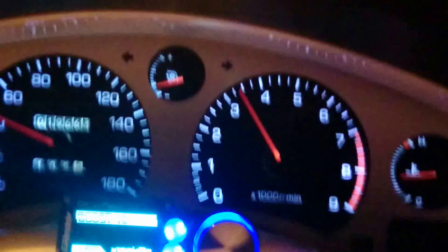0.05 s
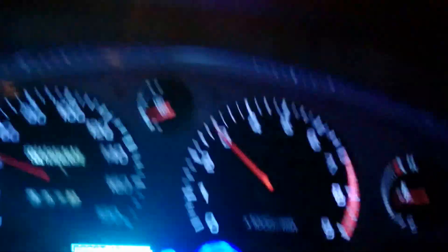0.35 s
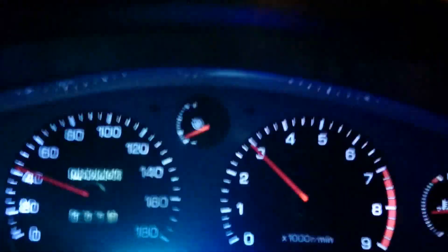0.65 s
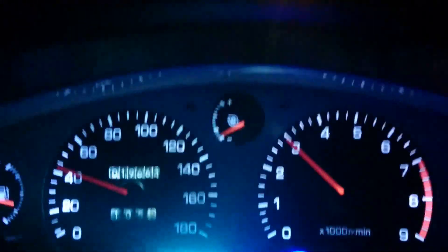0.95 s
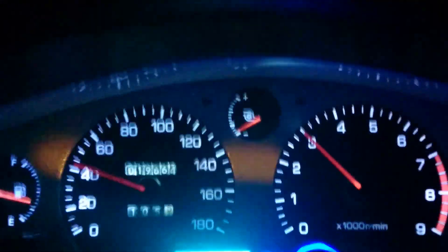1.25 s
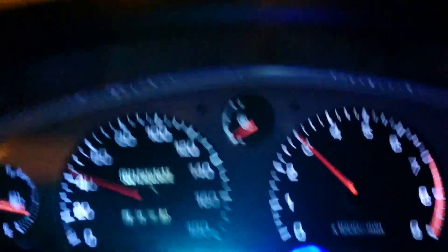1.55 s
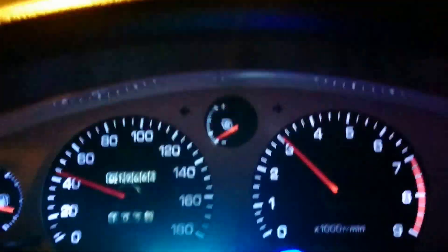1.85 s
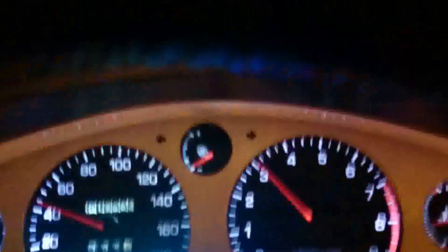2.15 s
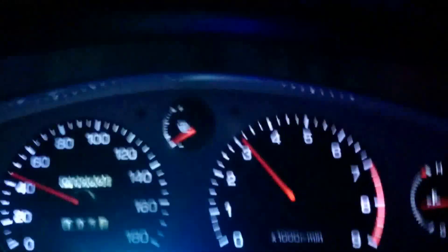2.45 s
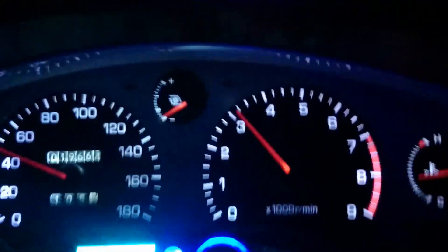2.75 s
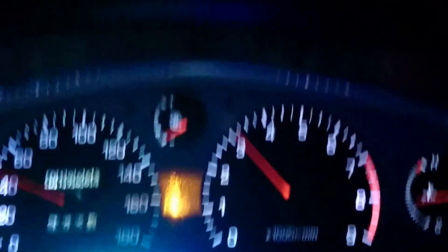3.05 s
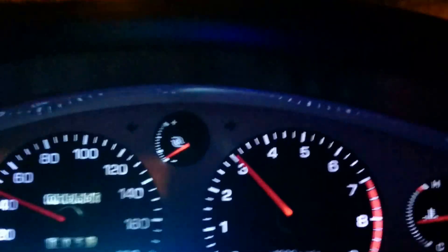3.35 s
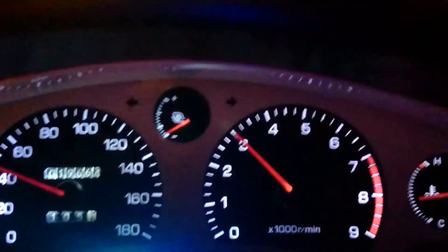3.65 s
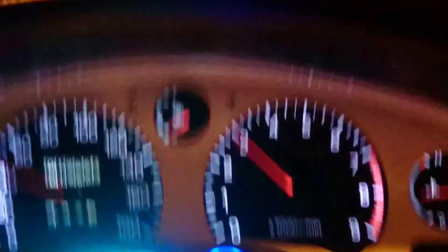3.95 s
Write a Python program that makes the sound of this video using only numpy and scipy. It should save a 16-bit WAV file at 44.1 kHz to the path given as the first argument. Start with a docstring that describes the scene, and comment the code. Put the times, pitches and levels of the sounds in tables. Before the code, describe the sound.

A turbocharged car engine drones at moderate revs, heard from the driver's seat. It eases off with brief shudders, pulls with a rising whistle, then eases again as the whistle falls into fluttering air puffs over road rumble.

```python
"""A turbocharged four-cylinder engine near 3000 rpm, heard inside the car as a booming series of orders.
The driver lifts and the drivetrain shudders; then the engine pulls and the turbo's whine rises with
its shaft speed. At a second lift the whine falls and the compressor surges: air breaks back through it
in fluttering puffs. Beneath it all the road, rougher towards the end, excites the body and the tyres."""
import sys
import numpy as np
from scipy import signal
from scipy.fft import rfft, irfft, dct
from scipy.io import wavfile
from scipy.ndimage import uniform_filter1d

SR = 44100
rng = np.random.default_rng(int(sys.argv[2]) if len(sys.argv) > 2 else 0)


def master_out(mix):
    """Clip the mix to full scale and print it as 16-bit PCM to the path in sys.argv[1]."""
    frames = np.transpose(np.atleast_2d(mix))
    ceiling = np.clip(frames, -1, 1)
    pcm = np.round(ceiling * 32767).astype(np.int16)
    wavfile.write(sys.argv[1], SR, pcm)


N = 176400

# Noise spectra. Each row: frequency in Hz, relative spectral density in dB.
SHELL_SPECTRUM = [(10, -38), (24, -23), (31, 0), (38, 5), (47, 0), (60, 7.5), (72, 7), (95, -8),
                  (200, -46.5)]  # deep boom of the body shell
RUMBLE_SPECTRUM = [(20, -40), (55, -20), (80, 1), (125, 1), (165, -1.5), (195, -7), (232, 0.5),
                   (262, -14.5), (330, -17), (800, -84)]  # road rumble
TYRE_SPECTRUM = [(150, -48), (255, -5.5), (305, -0.5), (345, -6), (395, 1), (445, -2), (490, -0.5),
                 (560, -4.5), (610, -7), (680, -4), (760, -4.5), (900, -2), (1020, -3), (1150, -9),
                 (1350, -8), (1700, -18.5), (2600, -18.5), (4000, -22), (8000, -42), (16000, -60)]  # tyre roar
PIPE_SPECTRUM = [(2500, -16), (4000, -16.5), (4800, -11), (5200, -2.5), (5550, -1.5), (5900, -3.5),
                 (6300, -10.5), (6650, -10.5), (7300, -18.5), (9000, -39), (16000, -54)]  # resonance of the intake pipe
HISS_SPECTRUM = [(1200, -18), (2500, 2.5), (4500, 5.5), (6500, 3.5), (7800, 0.5), (8700, 2.5),
                 (10200, -1.5), (11200, 3.5), (12500, -4.5), (13600, -1), (14900, -5), (16000, -5.5)]  # broad hiss of the intake air
CLATTER_SPECTRUM = [(700, 4.5), (1500, 2), (2300, -2), (3100, -2.5), (4300, -4.5), (5300, 1), (7000, -30),
                    (10000, -40), (16000, -35)]  # valves and injectors
# Envelopes. Each row: time in seconds, level in dB.
SHELL_LEVEL = [(0, -21), (.35, -25), (.6, -24), (.85, -31), (1.15, -28), (1.4, -21), (1.75, -28),
               (2.2, -28), (2.6, -24), (2.95, -24), (3.3, -18), (3.55, -18.5), (3.75, -20.5), (4, -25.5)]
RUMBLE_LEVEL = [(0, -31), (.2, -27), (.28, -27), (.44, -21.5), (.52, -19), (.7, -24.5), (1.1, -25.5),
                (1.4, -23.5), (2, -26), (2.6, -23), (2.95, -23), (3.2, -19), (3.6, -18.5), (3.85, -23),
                (4, -16.5)]
TYRE_LEVEL = [(0, -28.5), (.13, -31), (.26, -38.5), (.5, -29.5), (1, -32.5), (1.7, -35.5), (2.3, -30.5),
              (2.6, -28.5), (2.92, -30.5), (3.1, -24), (3.3, -26), (3.65, -28), (4, -28)]
CLATTER_LEVEL = [(0, -48), (.25, -48), (.55, -41), (1.2, -37.5), (2, -35), (2.7, -38), (3.2, -41), (4, -52)]
WHIRR_LEVEL = [(0, -63), (.35, -67), (.6, -45), (.95, -52), (1.2, -42), (1.45, -49), (1.8, -55), (2.6, -57),
               (3, -72), (4, -61)]  # accessory drive
FIRING_LEVEL = [(0, -17.5), (.1, -18), (.19, -13.5), (.27, -25.5), (.44, -34.5), (.51, -16), (.8, -16),
                (1.3, -17), (2, -17.5), (2.65, -18), (2.85, -19), (3, -25.5), (3.5, -25.5), (4, -21.5)]  # the firing tone, which also stands for engine load
# Shudders and bumps. Each row: centre in seconds, pitch in Hz, 1/e half-length in seconds, peak in dB.
JOLTS = [(.105, 99, 0.0066, -3.5), (.218, 91, 0.011, -1), (.367, 89.7, 0.0081, -10),
         (.497, 105.2, 0.0062, -6), (.518, 118.4, .005, -19), (3.879, 68, .014, -5.5)]
# Intake airflow. Each row: time in seconds, pipe level in dB, hiss level in dB.
AIRFLOW = [(0, -38.5, -36), (.11, -38, -39.5), (.25, -44, -49), (.45, -42, -50.5), (.55, -47.5, -54),
           (.8, -48.5, -48.5), (1.28, -46.5, -44.5), (1.5, -45.5, -47.5), (1.8, -45, -40.5),
           (2.2, -38, -39.5), (2.4, -34, -37), (2.72, -32.5, -34), (2.95, -32, -34.5), (3.15, -32, -35),
           (3.4, -36, -47), (3.66, -39.5, -56), (3.92, -41, -60), (4, -39.5, -61)]
# Compressor surge. Each row: peak time in seconds, change of the pipe in dB, change of the hiss in dB.
SURGE_PUFFS = [(.107, 1, 2), (.285, -3, 4), (.34, 0, 4), (.4, -2, 7), (.46, 1.5, 0), (2.785, 1, 6.5),
               (2.853, 0, 4.5), (2.918, 4, 2), (2.98, 3.5, 2.5), (3.039, 3.5, 3.5), (3.095, 4, 3),
               (3.155, 4, 0), (3.215, 6.5, 1), (3.274, 2.5, 5), (3.335, 5, 6), (3.393, 7.5, 8),
               (3.448, 5, 12), (3.503, 6, 10), (3.57, 6.5, 2), (3.615, 3, 2), (3.672, 1, 5), (3.735, -3, 4),
               (3.785, 3, 0), (3.835, 1.5, 12), (3.885, 1.5, 13), (3.945, -1, 14), (3.99, 1.5, 4)]
# Turbo whine. Each row: time in seconds, pitch in Hz, level of the whistle's core in dB.
TURBO_WHINE = [(0, 4710, -44), (.12, 4340, -42), (.28, 3930, -59), (.5, 3494, -46.5), (.62, 3500, -47),
               (.85, 3940, -53), (1.12, 4450, -49), (1.4, 4800, -57), (1.74, 5130, -44.5),
               (1.87, 5250, -38), (2.05, 5360, -42.5), (2.25, 5640, -37.5), (2.33, 5650, -35),
               (2.48, 5770, -34.5), (2.66, 5665, -38), (2.8, 5570, -41), (2.98, 4969, -43),
               (3.13, 4370, -39.5), (3.5, 3460, -54), (4, 2936, -71)]
# Engine speed. Each row: time in seconds, firings per second.
FIRING_RATE = [(0, 118), (.15, 111), (.28, 100), (.45, 96.5), (.68, 96.2), (1, 97.5), (1.3, 99.2),
               (1.7, 101), (2, 102.7), (2.5, 105), (2.75, 106), (3, 104.5), (3.3, 102.3), (3.55, 100.3),
               (4, 98)]
# Engine orders. Each row: multiple of the firing rate, level under load in dB, level coasting in dB.
ORDERS = [(.5, -34, -29.5), (1.5, -33, -47), (2, -31.5, -33), (2.5, -46, -44), (3.5, -65.5, -32),
          (4.5, -47, -52), (5.5, -60, -69), (6, -61, -54), (7, -49, -41.5), (8, -54, -39), (9, -39, -58),
          (9.5, -73, -72), (10, -47, -57), (13, -57, -49), (19, -59, -74)]
# Cabin drone. Each row: time in seconds, levels in dB at 3, 4 and 5 times the firing rate.
DRONE_LEVELS = [(0, -33, -39, -42), (.15, -41.5, -41, -50), (.27, -54, -51, -57), (.5, -47, -39, -42),
                (.75, -43, -40, -36.5), (1.3, -42, -37.5, -37.5), (1.55, -48, -52, -45),
                (2, -37, -47.5, -45), (2.2, -44, -46, -54), (2.45, -42, -47.5, -37), (2.9, -44, -38, -52),
                (3.2, -35, -44.5, -57), (3.5, -31, -49, -46), (3.75, -44, -42, -54), (4, -42, -42, -52)]
# Microphone balance. Each row: frequency in Hz, left minus right in dB.
STEREO_TILT = [(40, -8), (100, -4.5), (210, -3), (330, -4.5), (700, -2.5), (1100, -9.5), (1350, -3),
               (1700, -5), (2800, -3.5), (3600, -1.5), (4500, -0.5), (5700, -7), (6600, 0.5), (8300, 2.5),
               (9500, 6), (11000, 16), (12800, -2), (14800, -6), (16000, -8)]
# Likeness of the noise at the two microphones. Each row: frequency in Hz, coherence from 0 to 1.
COHERENCE = [(30, 1), (100, 0.86), (220, 0.91), (340, .5), (620, 0.05), (820, 0.53), (1330, 0.96),
             (1750, 0.054), (2400, 0.6), (3300, 0.27), (5000, 0.081), (5850, 0.54), (6250, .1),
             (6700, 0.27), (8500, .1), (16000, .05)]
# Phase between the microphones. Each row: frequency in Hz, lead of the left in radians.
PHASE_LEAD = [(40, 0.86), (100, 0.21), (240, 0.42), (320, 0.97), (420, -0.5), (800, -2), (1200, -2.5),
              (1500, -4.5), (2100, -5), (2600, -5), (3200, -3), (4600, -7), (5850, -8.5), (6700, -5)]

RIPPLE_DB, RIPPLE_STEP_HZ, RIPPLE_FULL_HZ = 1.94, 69.5, 340
PUFF_RISE_S, PUFF_FALL_S = 0.012, 0.016
PIPE_FLICKER_DB, HISS_FLICKER_DB, WHINE_FLICKER_DB, TURBULENCE_DB = 0.4, 1, 1, 1.33
SKIRT_DB, OCTAVE_DB = -3.5, -20  # relative to the whistle's core
SPEED_JITTER, WHINE_JITTER, CLATTER_DEPTH = .003, .00298, 0.19  # fractions of the mean
ORDER_WAVER_DB, FIRING_WAVER_DB = 1.5, .5
WHIRR_PER_FIRING = 23
CEILING, CUTOFF_HZ = .92, 15850


def amp(db):
    """Amplitude grows tenfold with every 20 dB."""
    return 10 ** (np.asarray(db) / 20)


def unit(x):
    """Normalisation to an rms of one."""
    return x / np.sqrt(np.mean(x ** 2) + 1e-20)


def curve(rows, column=1):
    """Linear interpolation of a time table at every sample."""
    rows = np.array(rows)
    return np.interp(np.arange(N) / SR, rows[:, 0], rows[:, column])


def at_frequency(rows, hz):
    """Interpolation of a table on a logarithmic frequency axis."""
    f, value = np.transpose(rows)
    return np.interp(np.log(hz + 1), np.log(f + 1), value)


def filtered(x, gain):
    """Filtering is spectral multiplication, here by N gains from zero to half the sample rate."""
    return idct_spectrum(dct(x, norm="ortho") * gain)


def idct_spectrum(spectrum):
    """A sum of weighted cosines restores the waveform."""
    return dct(spectrum, type=3, norm="ortho")


def wander(rate_hz):
    """Low-passed noise gives a smooth random drift of rms one."""
    f = np.fft.rfftfreq(N, 1 / SR)
    lowpass = np.exp(-(f / rate_hz) ** 2) * (f > 0)
    return unit(irfft(rfft(rng.standard_normal(N)) * lowpass, N))


def noise(spectrum):
    """Partial coherence: two microphones share only part of a coloured noise."""
    f = np.fft.rfftfreq(N, 1 / SR)
    shared, separate = rfft(rng.standard_normal((2, N)))
    coherence = np.clip(at_frequency(COHERENCE, f), 0, 1)
    left = shared * np.exp(1j * at_frequency(PHASE_LEAD, f))
    right = coherence * shared + np.sqrt(1 - coherence ** 2) * separate
    return unit(irfft(np.array([left, right]) * amp(at_frequency(spectrum, f)), N))


def turbulent(x):
    """Turbulence modulates a noise: small patches of its spectrum swell and sink."""
    frames = signal.stft(x, nperseg=512, noverlap=384)[2]
    patches = uniform_filter1d(rng.standard_normal(frames.shape[1:]), size=5, axis=0)
    patches = unit(uniform_filter1d(patches, size=12, axis=1))
    frames = frames * amp(TURBULENCE_DB * patches)
    return unit(signal.istft(frames, nperseg=512, noverlap=384)[1][:, :N])


def tone(phase, hz):
    """A sinusoid of rms one reaches the two microphones with a phase difference."""
    return np.sqrt(2) * np.array([np.cos(phase + at_frequency(PHASE_LEAD, hz)), np.cos(phase)])


def narrowband(phase, width_hz):
    """Random modulation broadens a spectral line, independently at each microphone."""
    return np.array([unit(wander(width_hz / 2) * np.cos(phase) + wander(width_hz / 2) * np.sin(phase))
                     for side in range(2)])


def cabin(x):
    """Interference of reflections off glass and trim ripples the spectrum at each microphone."""
    f = np.arange(N) * SR / (2 * N)
    sides = rng.standard_normal((2, 1000))
    ripple = np.array([np.interp(f / RIPPLE_STEP_HZ, np.arange(len(side)), side) for side in sides])
    return filtered(x, amp(RIPPLE_DB * ripple * np.minimum(f / RIPPLE_FULL_HZ, 1)))


def road():
    """Random excitation: rough asphalt makes the shell boom, the body rumble and the tyres roar."""
    boom = amp(curve(SHELL_LEVEL)) * noise(SHELL_SPECTRUM)
    rumble = amp(curve(RUMBLE_LEVEL)) * noise(RUMBLE_SPECTRUM)
    roar = amp(curve(TYRE_LEVEL)) * turbulent(noise(TYRE_SPECTRUM))
    return boom + rumble + roar


def jolts():
    """Transient excitation: each shudder or bump swings the cabin air for a few cycles."""
    t = np.arange(N) / SR
    out = np.zeros((2, N))
    for centre_s, hz, half_s, peak_db in JOLTS:
        envelope = amp(peak_db) / np.sqrt(2) * np.exp(-((t - centre_s) / half_s) ** 2)
        out += envelope * tone(2 * np.pi * hz * (t - centre_s), hz)
    return out


def intake():
    """Flow noise and surge: against the shut throttle, air breaks back through the compressor in puffs."""
    t = np.arange(N) / SR
    pipe_db = curve(AIRFLOW) + PIPE_FLICKER_DB * wander(30)
    hiss_db = curve(AIRFLOW, column=2) + HISS_FLICKER_DB * wander(28)
    for peak_s, pipe_change_db, hiss_change_db in SURGE_PUFFS:
        width_s = np.where(t < peak_s, PUFF_RISE_S, PUFF_FALL_S)
        puff = np.exp(-((t - peak_s) / width_s) ** 2)
        pipe_db += pipe_change_db * puff
        hiss_db += hiss_change_db * puff
    pipe = amp(pipe_db) * turbulent(noise(PIPE_SPECTRUM))
    return pipe + amp(hiss_db) * turbulent(noise(HISS_SPECTRUM))


def turbo():
    """A rotor's tone follows its shaft speed; turbulence broadens it into an airy whistle."""
    hz = curve(TURBO_WHINE) * (1 + WHINE_JITTER * wander(26.7))
    phase = 2 * np.pi * np.cumsum(hz) / SR
    core = narrowband(phase, width_hz=190)
    skirt = amp(SKIRT_DB) * narrowband(phase, width_hz=710)
    octave = amp(OCTAVE_DB) * narrowband(2 * phase, width_hz=450)
    level_db = curve(TURBO_WHINE, column=2) + WHINE_FLICKER_DB * wander(35)
    return amp(level_db) * (core + skirt + octave)


def accessory_whirr(firing_phase):
    """Coupled rotation: the accessory drive whirrs at a fixed multiple of the firing rate."""
    return amp(curve(WHIRR_LEVEL)) * narrowband(WHIRR_PER_FIRING * firing_phase, width_hz=84)


def valve_clatter(firing_phase):
    """Amplitude modulation: valve and injector noise pulses once per firing."""
    pulsing = 1 + CLATTER_DEPTH * np.cos(firing_phase)
    return amp(curve(CLATTER_LEVEL)) * unit(turbulent(noise(CLATTER_SPECTRUM)) * pulsing)


def engine():
    """Periodic firing gives a fundamental and a series of orders whose balance shifts with load."""
    hz = curve(FIRING_RATE) * (1 + SPEED_JITTER * wander(11.2))
    phase = 2 * np.pi * np.cumsum(hz) / SR
    firing_db = curve(FIRING_LEVEL)
    load = (firing_db - firing_db.min()) / np.ptp(firing_db)  # 0 coasting, 1 pulling hardest
    boom = amp(firing_db + FIRING_WAVER_DB * wander(14)) * tone(phase, hz)
    orders = [(k, coast_db + load * (loaded_db - coast_db)) for k, loaded_db, coast_db in ORDERS]
    drone = [(k, curve(DRONE_LEVELS, column=k - 2)) for k in (3, 4, 5)]
    for k, level_db in orders + drone:
        gain = amp(level_db + ORDER_WAVER_DB * wander(3.3))
        boom += gain * tone(k * phase + 2 * np.pi * rng.random(), k * hz)
    return boom + valve_clatter(phase) + accessory_whirr(phase)


def scene():
    """Superposition: all sources add in the cabin, heard from the driver's seat."""
    return cabin(engine() + jolts() + road() + turbo() + intake())


def record(dry):
    """Each microphone has its own frequency response; saturation rounds peaks before a band limit."""
    f = np.arange(N) * SR / (2 * N)
    tilt_db = at_frequency(STEREO_TILT, f)
    response = amp(np.array([tilt_db, -tilt_db]) / 2)
    coloured = filtered(dry, response / np.sqrt(np.mean(response ** 2, axis=0)))
    rounded = coloured / (1 + (coloured / CEILING) ** 12) ** (1 / 12)
    lowpass = np.clip((CUTOFF_HZ - f) / 200 + .5, 0, 1)
    return filtered(rounded, lowpass)


dry = scene()
out = record(dry)
master_out(out)
```